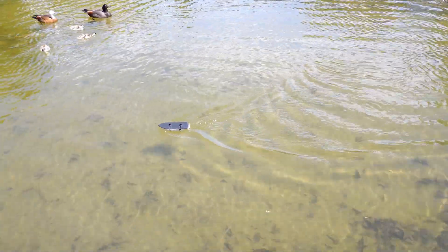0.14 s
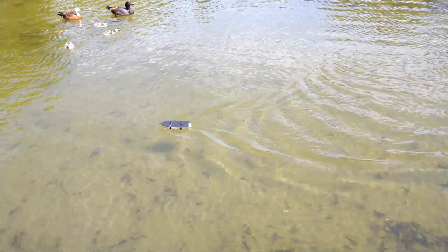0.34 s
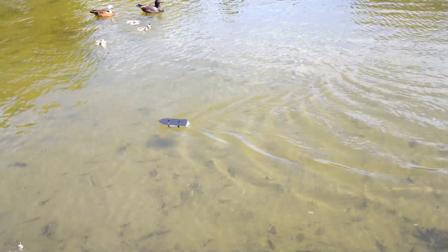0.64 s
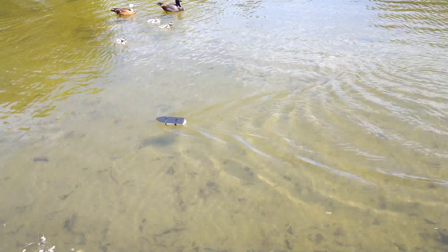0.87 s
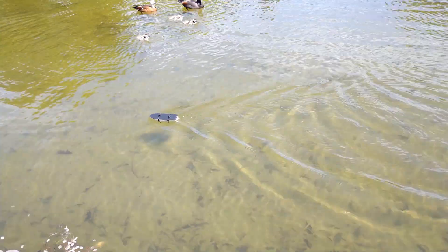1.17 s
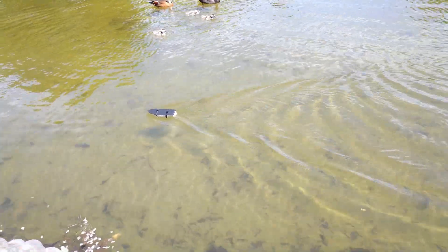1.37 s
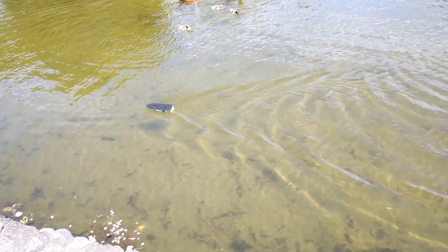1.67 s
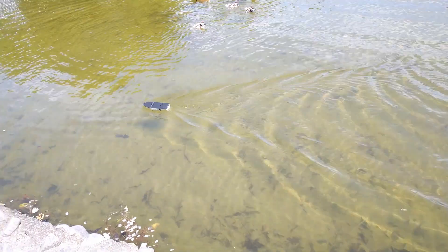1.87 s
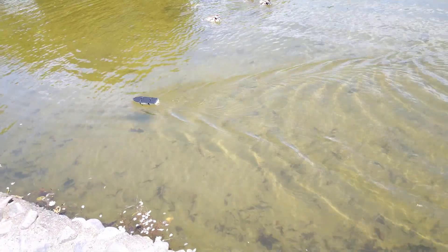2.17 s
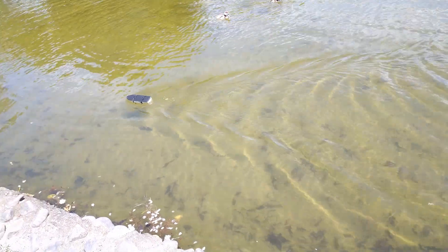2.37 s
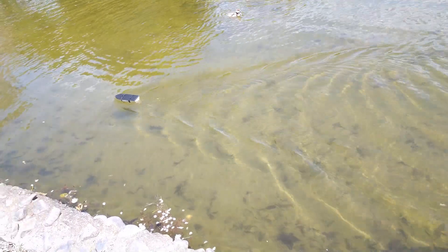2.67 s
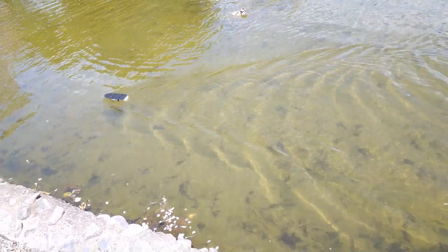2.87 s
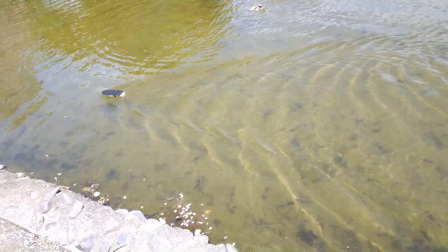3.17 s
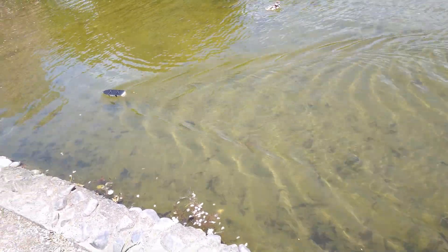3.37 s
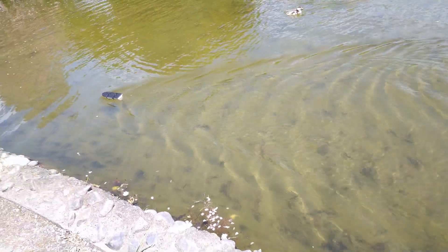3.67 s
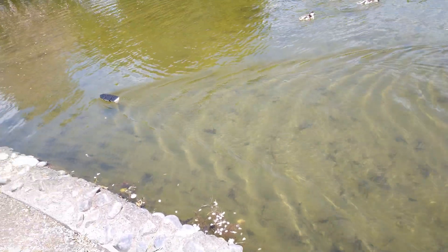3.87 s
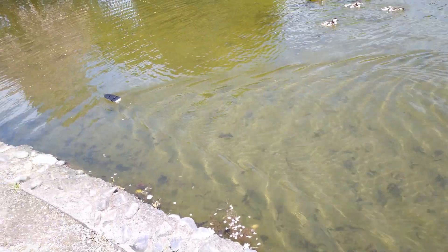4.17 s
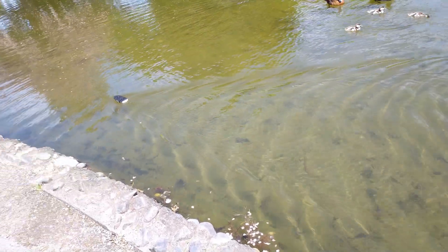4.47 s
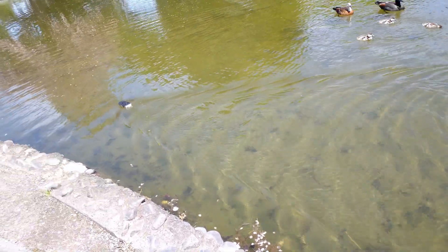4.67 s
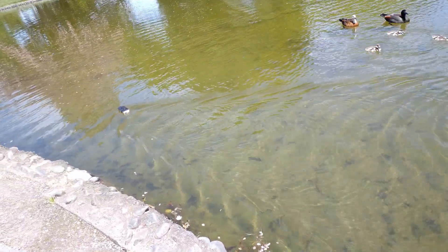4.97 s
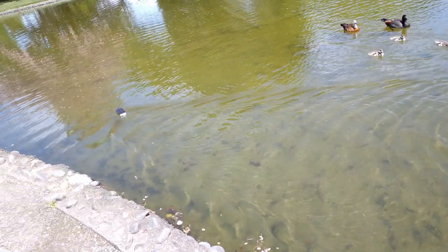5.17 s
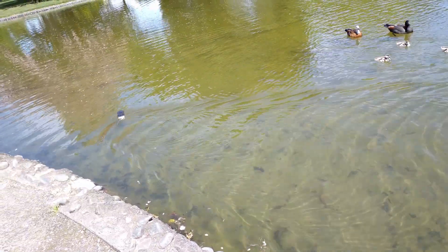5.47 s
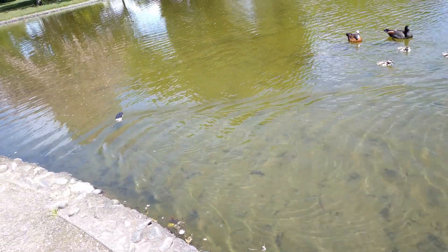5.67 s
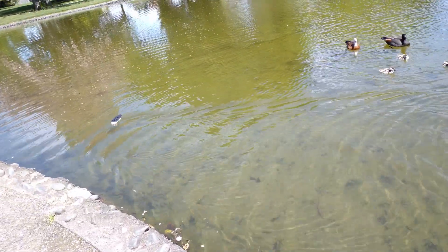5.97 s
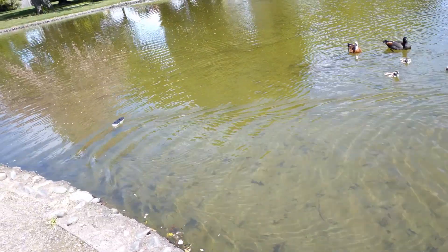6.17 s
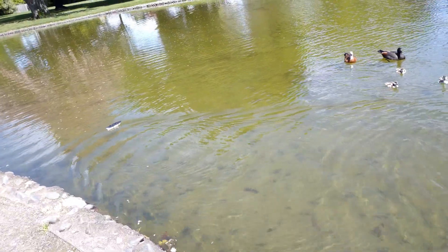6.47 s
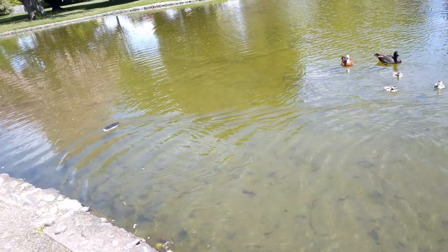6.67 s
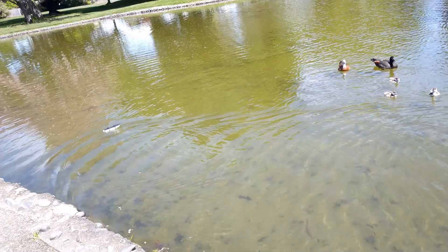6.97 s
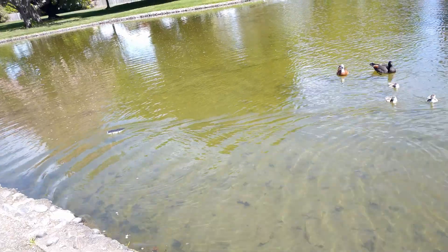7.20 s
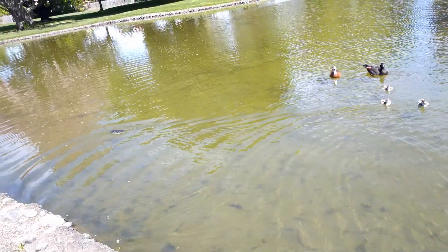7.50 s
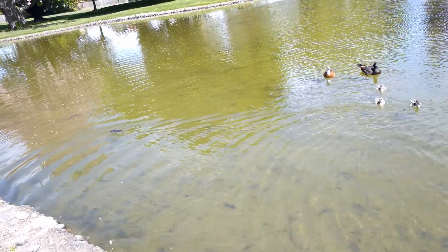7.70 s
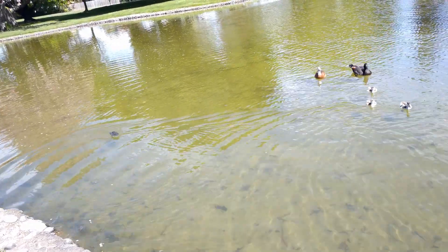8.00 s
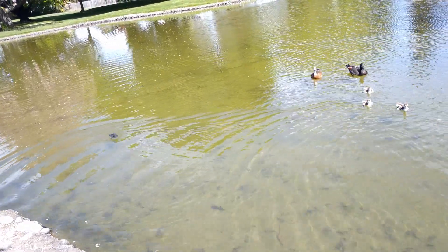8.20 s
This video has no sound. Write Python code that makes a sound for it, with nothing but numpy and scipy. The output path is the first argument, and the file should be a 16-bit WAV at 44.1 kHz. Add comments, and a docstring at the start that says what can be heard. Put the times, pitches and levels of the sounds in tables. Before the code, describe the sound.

A model boat's small electric motor whines on a high, slightly wavering note with a raspy buzz as it crosses a park pond. About halfway through it winds down, returning near the end as a thinner, lower whine. Songbirds chirp and twitter throughout with a slight echo, and wavelets lap and plip at the stone edge. Low wind rumbles on the microphone, joined by a distant engine's hum.

```python
"""A model boat's electric motor whines across a park pond, winds down after 4 s, later runs on slowly.
Its commutator gives the whine; brush noise rasps and rings the hull.
Songbirds chirp and twitter in echoing trees; wavelets lap, slap the stone edge and trap ringing bubbles.
Low wind rumble and a rustle mix with the hum of a distant engine."""
import sys
import numpy as np
from scipy import signal
from scipy.fft import rfft, irfft
from scipy.io import wavfile
from scipy.ndimage import uniform_filter1d, map_coordinates

SR = 44100
rng = np.random.default_rng(int(sys.argv[2]) if len(sys.argv) > 2 else 0)


def output_pcm(signal):
    """Save a mono or channel-first signal as 16-bit PCM at the path in sys.argv[1].

    Samples are clipped to [-1, 1] before scaling.
    """
    pcm = np.clip(np.atleast_2d(signal).T, -1, 1) * 32767
    wavfile.write(sys.argv[1], SR, np.round(pcm).astype(np.int16))


N = 367980
TIME_S = np.arange(N) / SR
CUT_S = 4.26  # throttle cut
GRIT_DEPTH, GRIT_PER_S = .19, 500  # brush flutter


def undb(db):
    """Decibels to gain."""
    return 10 ** (np.asarray(db) / 20)


def unit(x):
    """Scale to rms 1."""
    return x / np.sqrt(np.mean(x ** 2))


def curves(table):
    """Columns after the first (t/s), interpolated per sample."""
    s, *columns = np.transpose(table)
    return [np.interp(TIME_S, s, c) for c in columns]


def walk(per_s):
    """Smooth random drift, rms 1."""
    hold = max(int(SR / per_s), 2)
    steps = np.repeat(rng.standard_normal(N // hold + 1), hold)
    return unit(uniform_filter1d(uniform_filter1d(steps, hold), hold)[:N])


def colour(x, points):
    """Minimum-phase filter through (f/Hz, gain/dB) points; output rms 1."""
    hz, db = np.transpose(points)
    size = 8192
    grid_hz = np.maximum(np.fft.rfftfreq(size, 1 / SR), 1)
    cepstrum = irfft(np.log(undb(np.interp(np.log(grid_hz), np.log(hz), db))))
    cepstrum[1:size // 2] *= 2
    cepstrum[size // 2 + 1:] = 0
    impulse = irfft(np.exp(rfft(cepstrum)))
    return unit(signal.fftconvolve(x, impulse)[:N])


def resonate(x, hz, *widths_hz):
    """One resonator per width, in series; gain 1 at the centre."""
    for width_hz in widths_hz:
        x = signal.lfilter(*signal.iirpeak(hz, hz / width_hz, fs=SR), x)
    return x


def angle(hz):
    """Running phase of a moving frequency."""
    return 2 * np.pi * np.cumsum(hz) / SR


def add(out, s, sound):
    """Mix a short sound in at time s."""
    i = max(int(s * SR), 0)
    out[i:i + len(sound)] += sound[:max(N - i, 0)]


def bump(s, sigma_s):
    """Gaussian envelope, peak 1."""
    return np.exp(-.5 * ((TIME_S - s) / sigma_s) ** 2)


def echo(x, t60_s):
    """Diffuse return from banks and trees, unit energy gain."""
    t = np.arange(SR // 2) / SR
    tail = rng.standard_normal(len(t)) * undb(-60 * t / t60_s) * (1 - np.exp(-t / .003))
    return signal.fftconvolve(x, tail / np.linalg.norm(tail))[:N]


def burst(on_s, off_s, db, up_db_per_s=129, fade_db_per_s=1, down_db_per_s=91):
    """Gain of a throttle burst: spins up, fades as the boat draws away, spins down."""
    up_db = up_db_per_s * np.maximum(on_s - TIME_S, 0)
    fade_db = fade_db_per_s * np.maximum(TIME_S - on_s, 0)
    down_db = down_db_per_s * np.maximum(TIME_S - off_s, 0)
    return undb(db - up_db - fade_db - down_db)


def motor():
    """The commutator whines over weaker shaft lines; brush noise, pulsed once a turn, rings the hull."""
    # full-throttle whine: t/s, f/Hz, relative level/dB, relative octave level/dB
    whine_track = [(0.0, 2592, -40.5, -57), (0.2, 2579, -47, -53), (0.4, 2611, -45, -62),
                   (0.82, 2550, -53, -53.5), (1.05, 2542, -41.5, -55), (1.09, 2608, -49, -61),
                   (1.26, 2558, -45, -58), (1.39, 2567, -52, -63), (1.56, 2660, -44.5, -60),
                   (1.64, 2602, -55, -55), (2.11, 2664, -53, -49), (2.3, 2650, -66, -50),
                   (2.69, 2636, -63, -47.5), (2.87, 2617, -59, -48.5), (3.0, 2588, -50, -49),
                   (3.28, 2546, -48, -50.5), (3.39, 2627, -60, -51), (3.61, 2548, -52, -53),
                   (3.68, 2625, -64, -51.5), (4.11, 2608, -59, -56.5), (4.15, 2540, -56, -56)]
    # throttle bursts: on/s, off/s, rasp level/dB, hull buzz level/dB
    throttle = [(0, 4.42, -50.5, -49), (6.801, 7.5, -61, -54), (8.32, 8.34, -49, -54)]
    # shaft harmonics: order, relative level/dB
    shaft_lines = [(3, -15.5), (4, -13.5), (7, -16.5), (8, -12), (9, -9.5), (11, -12.5), (12, -7.5),
                   (13, -13.5), (14, -15), (15, -12.5), (17, -17), (18, -19.5), (19, -14), (21, -8),
                   (22, -16), (23, -14), (24, -15), (25, -15), (26, -13), (27, -18), (28, -21), (29, -19),
                   (30, -14.5), (31, -20.5)]
    # hull resonances: f/Hz, width/Hz, gain/dB
    hull_modes = [(974, 180, -6.5), (2100, 170, -2), (2536, 130, -2), (3036, 330, 0), (3700, 790, -6.5)]
    # brush sizzle: t/s, relative level/dB
    sizzle_track = [(0, -60), (.5, -58), (1.1, -50.5), (2.7, -59.5), (3.1, -73)]
    # brush rasp spectrum: f/Hz, gain/dB
    rasp_spectrum = [(3000, -42), (4000, -10.5), (4650, -3.5), (5400, 7), (5800, -2), (6800, -3),
                     (7150, -10.5), (7650, -7.5), (8400, -31)]
    hz, whine_db, octave_db = curves(whine_track)
    sizzle_db, = curves(sizzle_track)
    rasp_gain = sum(burst(on, off, db) for on, off, db, _ in throttle)
    buzz_gain = sum(burst(on, off, db) for on, off, _, db in throttle)
    full_throttle = np.clip(.5 + (CUT_S - TIME_S) / .061, 0, 1)
    phase = angle(hz * (1 + .002105 * walk(90)))  # propeller load shakes the speed
    shaft = phase / 10  # ten whine cycles a turn
    whine = np.zeros(N)
    for k, db in enumerate([whine_db, octave_db], 1):
        gain = undb(db - .5 + .75 * walk(44.77))
        grit = unit(1 + GRIT_DEPTH * k * walk(GRIT_PER_S))  # uneven brush contact
        whine += gain * grit * np.sin(k * phase)
    lines = sum(undb(db + 3.5 * walk(6)) * np.sin(k * shaft + .5 * walk(70)) for k, db in shaft_lines)
    tones = np.sqrt(2) * (whine + undb(-1.5) * rasp_gain * lines)
    brushes = rng.standard_normal(N) * (1 + .26 * np.cos(shaft)) * undb(.84 * walk(30))
    buzz = unit(sum(undb(db) * resonate(brushes, f, width, 2 * width) for f, width, db in hull_modes))
    fizz = unit(resonate(resonate(brushes, 7290, 450), 7530, 470))
    casing = resonate(np.sin(3 * phase), 7650, 130)  # third harmonic crosses a casing resonance
    sizzle = undb(sizzle_db) * (undb(-1) * fizz + undb(-2) * casing)
    return full_throttle * (tones + sizzle) + rasp_gain * colour(brushes, rasp_spectrum) + buzz_gain * buzz


def wind():
    """Gusting rumble, steady air and a rustle that comes and goes."""
    # wind rumble spectrum: f/Hz, gain/dB
    rumble_spectrum = [(12, -24), (25, -4.5), (55, 0.5), (100, -1.5), (160, -7), (260, -11), (400, -20.5),
                       (700, -52.5)]
    # spectrum of the air over the pond: f/Hz, gain/dB
    air_spectrum = [(200, -20), (320, -14.5), (470, -9), (750, -5.5), (900, -7.5), (1130, -4), (1600, -3),
                    (2200, -4), (2700, -6), (4100, -10.5), (5600, -14.5), (6500, -20), (7600, -19),
                    (8400, -44.5)]
    # rustle around the pond: t/s, level/dB
    rustle_track = [(0, -53.5), (4.6, -56.5), (5.25, -63), (5.8, -58), (6.35, -63), (7, -54.5), (8.34, -53)]
    # f/Hz, gain/dB
    rustle_spectrum = [(1200, -19.5), (2600, 6.5), (4400, 9.5), (5500, 3.5), (6300, -4.5), (8000, -31)]
    rustle_db, = curves(rustle_track)
    rumble = undb(-49 + walk(6)) * colour(rng.standard_normal(N), rumble_spectrum)
    air = undb(-50.5 + walk(40)) * colour(rng.standard_normal(N), air_spectrum)
    rustle = undb(rustle_db + 1.6 * walk(35)) * colour(rng.standard_normal(N), rustle_spectrum)
    return rumble + air + rustle


def engine():
    """A far engine gathers speed; only its two lowest lines carry, throbbing on the wind."""
    # engine firing: t/s, f/Hz, relative level/dB
    firing = [(2.8, 73.1, -59), (3.6, 76, -49.5), (5.2, 82.95, -51.5), (7.25, 87.9, -47.5),
              (8.34, 91, -54.5)]
    hz, db = curves(firing)
    phase = angle(hz * (1 + .0219 * walk(14)))
    throb = unit(1 + .45 * walk(24))
    hum = np.sin(phase) + undb(-13.5) * np.sin(2 * phase + walk(11))
    return np.sqrt(2) * undb(db - .5) * throb * hum


def note(length_s, pitches_hz, db, rasp=0):
    """A hoarse bird whistle bent through three pitches; rasp deepens its pitch and level shake."""
    u = np.linspace(0, 1, int(length_s * SR))
    hz = np.polyval(np.polyfit([0, .5, 1], pitches_hz, 2), u)
    flutter, tremor = (unit(uniform_filter1d(rng.standard_normal(SR // 2), k))[:len(u)] for k in (60, 150))
    swell = signal.windows.tukey(len(u), .5) * unit(undb(2.2 * (1 + rasp) * tremor))
    phase = angle(hz * (1 + (.019 + .05 * rasp) * flutter))
    return np.sqrt(2) * undb(db) * swell * np.sin(phase)


def chip(length_s, start_hz, db, fall_octaves_per_s=15.5):
    """A short, raspy downward slide."""
    octaves = fall_octaves_per_s * length_s * np.array([0, .5, 1])
    return note(length_s, start_hz * 2 ** -octaves, db, rasp=.4)


def chirrup(top_hz, db, fall_s, end_hz, rasp, flick_s=.016, fade_db=6.5):
    """A swelling upward flick, then a fading fall, steepest at first."""
    flick = note(flick_s, top_hz * np.array([.83, .92, 1]), db, rasp)
    flick *= np.sqrt(np.linspace(0, 1, len(flick)))
    fall = note(fall_s, [top_hz, .95 * np.sqrt(top_hz * end_hz), end_hz], db, rasp)
    fall *= undb(np.linspace(0, -fade_db, len(fall)))
    out = np.zeros(len(flick) + len(fall))
    turn = int(.75 * len(flick))
    out[:len(flick)] += flick
    out[turn:turn + len(fall)] += fall
    return out


def birds(far_chips_per_s=4, far_hz=4300, whistle_hz=4160, whistle_s=.186, pip_s=.03):
    """Songbird calls; part of each arrives as echo from the trees."""
    # falling chips: t/s, length/s, start f/Hz, level/dB
    chips = [(.32, .036, 4280, -43.5), (.462, 0.029, 3980, -46), (.918, 0.038, 5080, -45),
             (1.022, 0.028, 4730, -45), (1.116, 0.029, 4900, -42), (2.117, 0.049, 6360, -44),
             (2.574, 0.058, 5700, -44), (3.893, 0.057, 5320, -45.5), (3.994, 0.041, 4700, -46.5),
             (4.548, 0.038, 4800, -50), (5.415, 0.022, 4560, -49), (5.568, .022, 5420, -51),
             (6.53, .032, 4600, -47), (6.755, .05, 4800, -49), (7.63, .022, 4440, -49),
             (8.07, .03, 3150, -50)]
    # peeps: t/s, length/s, start f/Hz, middle f/Hz, end f/Hz, level/dB
    peeps = [(.376, 0.025, 3070, 3160, 3080, -43.5), (0.544, 0.025, 2300, 2420, 2400, -43),
             (1.199, .036, 5100, 5200, 5400, -44.5), (2.098, 0.028, 6250, 6300, 6360, -51),
             (2.156, 0.044, 4150, 3800, 4100, -40.5), (2.199, .02, 4120, 3670, 2900, -44.5),
             (2.204, 0.064, 2470, 2550, 2160, -46), (2.4, 0.034, 3020, 3230, 2950, -36),
             (2.43, .016, 2830, 2570, 2350, -48), (2.647, 0.059, 2550, 2415, 1710, -46.5),
             (3.013, .034, 2800, 3150, 2750, -47), (3.425, 0.03, 3700, 3920, 4200, -54),
             (4.037, .048, 2595, 2670, 2477, -44), (4.424, 0.025, 4060, 4366, 4860, -47.5),
             (4.627, 0.024, 2570, 2470, 2370, -48.5), (4.663, 0.066, 3640, 3400, 3020, -48.5),
             (4.765, 0.053, 2705, 2990, 2810, -47), (4.854, 0.027, 3560, 3040, 2900, -45),
             (5.718, 0.034, 2750, 2550, 2300, -51), (5.831, 0.04, 2994, 2800, 2530, -51.5),
             (5.975, 0.0235, 2340, 2260, 2100, -45.5), (6.021, 0.034, 3760, 3795, 3340, -40.5),
             (6.043, 0.045, 3150, 2950, 2360, -45), (6.586, 0.057, 2780, 2510, 1848, -49.5),
             (6.833, 0.029, 3040, 2860, 2630, -50), (7.168, 0.042, 2870, 3190, 2740, -40),
             (7.556, 0.034, 2245, 2690, 2600, -48), (7.644, 0.028, 2720, 2650, 2290, -42.5),
             (7.768, 0.029, 2810, 2670, 2150, -44), (8.257, 0.083, 6840, 6500, 5940, -56),
             (8.269, 0.087, 5860, 5530, 4960, -56)]
    # chirrups: t/s, top f/Hz, level/dB, fall/s, end f/Hz, rasp/0-1
    chirrups = [(.573, 4480, -41, 0.053, 2720, 0.7), (1.189, 4450, -40.5, .052, 2900, 0.87),
                (2.355, 4780, -37, .025, 3040, 0.16), (2.966, 4790, -39, 0.035, 3000, 0.2),
                (3.481, 4820, -43.5, 0.072, 2900, 0.92), (3.659, 4590, -41.5, 0.039, 3130, 0.74),
                (4.188, 4630, -41, .05, 2900, 0.9), (4.803, 5000, -43, 0.031, 3100, .9),
                (7.128, 4680, -38, .026, 3000, 0.13)]
    # runs of falling pips: t/s, rate/Hz, count, f/Hz
    trills = [(4.998, 13.0, 7, 3480), (5.378, 13.4, 6, 3020), (5.83, 10.8, 2, 3000)]
    # faint whistles: t/s, level/dB
    whistles = [(5.57, -54.5), (5.76, -54)]
    draws = rng.random((int(far_chips_per_s * N / SR), 2))
    far_chips = [(when * N / SR, .033, far_hz * 2 ** (tone - .5), -53) for when, tone in draws]
    # t/s, sound, echo share of the energy
    calls = [(s, chip(*shape), .33) for s, *shape in list(chips) + far_chips]
    calls += [(s, note(length_s, bend_hz, db), .14) for s, length_s, *bend_hz, db in peeps]
    calls += [(s, chirrup(*shape), .2) for s, *shape in chirrups]
    calls += [(s + k / rate_hz, note(pip_s, hz * np.array([1.04, .99, .93]), db=-50.5), .22)
              for s, rate_hz, count, hz in trills for k in range(round(count))]
    calls += [(s, note(whistle_s, whistle_hz * np.array([1, .99, .98]), db), .4) for s, db in whistles]
    direct, scattered = np.zeros(N), np.zeros(N)
    for s, sound, share in calls:
        add(direct, s, np.sqrt(1 - share) * sound)
        add(scattered, s, np.sqrt(share) * sound)
    return direct + echo(scattered, t60_s=.36)


def lapping(drops_per_s=400):
    """Surges of tiny splashes; hollows between the stones ring higher or lower as the water shifts."""
    # lapping at the edge: t/s, nominal ring f/Hz, level/dB
    lap_track = [(.8, 1451, -55), (1.8, 1449, -53), (3.1, 1460, -51), (5, 1601, -53), (6.4, 1609, -54.5),
                 (8.2, 1520, -51.5)]
    # lapping spectrum: f/Hz, gain/dB
    lap_spectrum = [(400, -26.5), (750, -11.5), (1150, -7.5), (1300, -9.5), (1520, 5), (1720, -5.5),
                    (1950, -13), (3000, -15), (4200, -8), (6000, -23), (8000, -54.5)]
    hz, db = curves(lap_track)
    surge = undb(3.3 * walk(26))
    hits = rng.random(N) < drops_per_s * surge / SR
    drops = hits * rng.uniform(-.92, 1, N) * undb(2 * np.minimum(rng.exponential(size=N), 3))
    read_position = np.cumsum(hz / np.mean(hz))
    return undb(db) * map_coordinates(colour(drops, lap_spectrum), [read_position], mode="mirror")


def slaps(splashes_per_s=9):
    """Wavelets hit the stone in soft noise bursts, among faint random splashes."""
    # wavelet slaps: t/s, relative level/dB
    wavelets = [(.521, -39), (4.114, -33), (4.668, -41), (4.89, -38.5), (5.001, -39.5), (5.159, -43),
                (5.409, -46), (5.429, -42.5), (6.179, -42), (6.202, -38), (6.339, -45), (6.384, -37.5),
                (6.418, -37), (6.735, -44), (7.863, -41)]
    t = np.arange(int(.04 * SR)) / SR
    envelope = np.exp(-t / .0038) * (1 - np.exp(-t / .00089))
    draws = rng.random((int(splashes_per_s * N / SR), 2))
    splashes = [(when * N / SR, -52.5 + 8 * size) for when, size in draws]
    out = np.zeros(N)
    for s, db in list(wavelets) + splashes:
        add(out, s, undb(db + 12.5) * rng.standard_normal(len(t)) * envelope)
    return signal.sosfilt(signal.butter(3, [550, 3800], "band", fs=SR, output="sos"), out)


def plips(small_count=70, ring_s=.0025, rise_per_s=9.9):
    """Trapped bubbles ring briefly with rising pitch; small ones come at random."""
    # loudest bubbles: t/s, relative level/dB, f/Hz
    loud = [(.522, -33, 1400), (1.794, -33, 1440), (2.177, -26, 1400), (2.28, -38, 710), (2.41, -36, 1450),
            (2.4857, -34, 1500), (2.616, -32, 1530), (2.83, -38, 1050), (2.9692, -27, 1510),
            (3.064, -31.5, 1430), (3.223, -32, 1454), (3.93, -34, 1545), (4.1144, -31, 1478),
            (4.235, -31.5, 1550), (4.3277, -29.5, 1478), (4.712, -35, 1540), (4.744, -37, 1560),
            (4.795, -33, 1490), (4.89, -25.5, 1540), (5.124, -40, 2050), (5.1592, -34.5, 1580),
            (5.247, -31, 1600), (5.264, -37, 1550), (5.408, -36, 720), (5.517, -33, 1520),
            (5.923, -33, 1570), (6.022, -35, 1610), (6.2036, -32, 1550), (6.34, -43, 1680),
            (6.512, -38, 1597), (6.7344, -38, 1550), (6.871, -33.5, 1500), (7.096, -32.5, 1640),
            (7.208, -33.5, 1440), (7.863, -31.5, 1520), (7.974, -35, 1440), (8.212, -35, 1510)]
    t = np.arange(int(.04 * SR)) / SR
    small = [(when * N / SR, -48 + 8 * size ** 2, 1350 * 2 ** (1.4 * (tone - .5)))
             for when, size, tone in rng.random((small_count, 3))]
    out = np.zeros(N)
    for s, db, hz in list(loud) + small:
        decay_s = ring_s * 2 ** rng.uniform(-.44, .5)
        envelope = np.exp(-t / decay_s) * (1 - np.exp(-t / .0006))
        add(out, s, undb(db + 2) * envelope * np.sin(angle(hz * (1 + rise_per_s * t))))
    return out


def wind_down(start_hz=2570, sag_hz_per_s2=26000, loudest_s=4.37):
    """Throttle cut: the whine sags ever faster, loudest on its way down."""
    hz = np.maximum(start_hz - sag_hz_per_s2 * np.maximum(TIME_S - CUT_S, 0) ** 2, 0)
    judder = 1 + .02 * walk(GRIT_PER_S)
    grit = unit(1 + 2 * GRIT_DEPTH * walk(GRIT_PER_S))
    return np.sqrt(2) * undb(-46.5) * bump(loudest_s, sigma_s=.02) * grit * np.sin(angle(hz * judder))


def hisses(width_hz=1000):
    """Brief rasping swells of band noise."""
    # hisses: t/s, sigma/s, f/Hz, peak level/dB
    swells = [(6.77, 0.075, 5330, -52), (6.76, 0.073, 4050, -49), (7.13, 0.038, 4300, -45.5),
              (8.01, 0.038, 4250, -46.5)]
    grain = rng.standard_normal(N) * undb(3 * walk(150))
    return sum(undb(db) * bump(s, sigma_s) * unit(resonate(grain, hz, width_hz, width_hz))
               for s, sigma_s, hz, db in swells)


def slow_motor(restart_s=6.88, restart_hz=1674, cruise_hz=1927, settle_s=.14):
    """The motor restarts: a thin, unsteady whine climbs to a slow cruise."""
    # slow whine: t/s, level/dB
    cruise_track = [(6.8, -81), (6.95, -59.5), (7.4, -58.5), (7.65, -71), (8.34, -59)]
    db, = curves(cruise_track)
    hz = cruise_hz + (restart_hz - cruise_hz) * np.exp(-np.maximum(TIME_S - restart_s, 0) / settle_s)
    tremble = 1 + .002 * walk(70)
    return np.sqrt(2) * undb(db + 2 * walk(30)) * np.sin(angle(hz * tremble))


def scene():
    """Boat, park and water, mono."""
    boat = motor() + wind_down() + slow_motor()
    park = wind() + engine() + birds() + hisses()
    edge = slaps() + plips()
    water = lapping() + edge + undb(-18) * echo(edge, t60_s=.13)
    return (boat + park + water)[None]


def record(dry, top_hz=8250):
    """The recorder's steep low-pass."""
    return signal.sosfilt(signal.ellip(10, .2, 70, top_hz, fs=SR, output="sos"), dry)


dry = scene()
out = record(dry)
output_pcm(out)
```